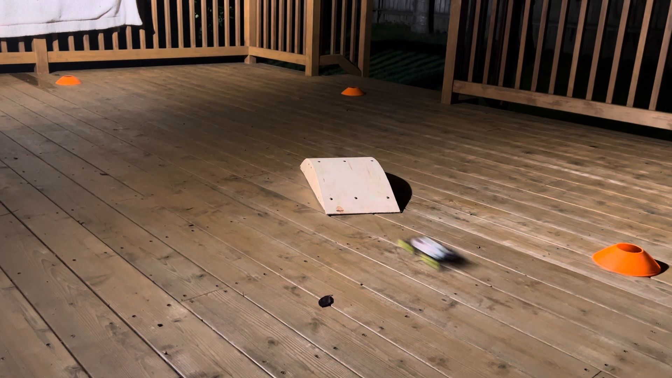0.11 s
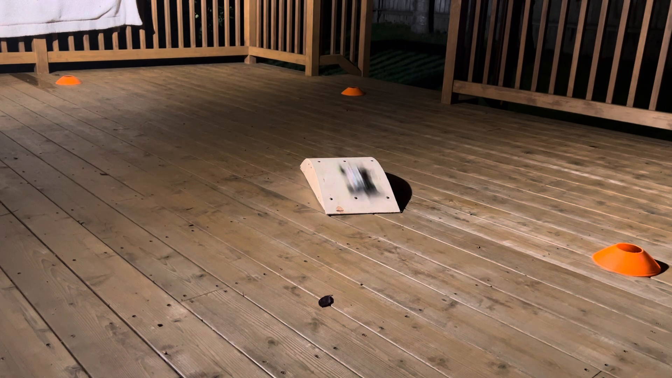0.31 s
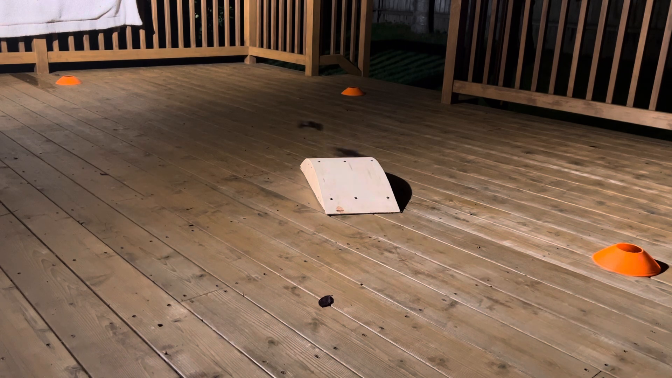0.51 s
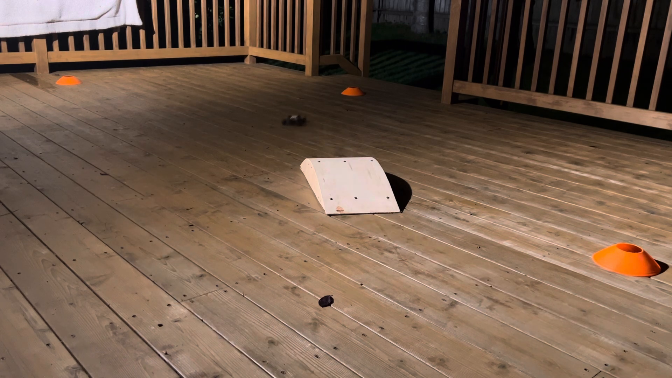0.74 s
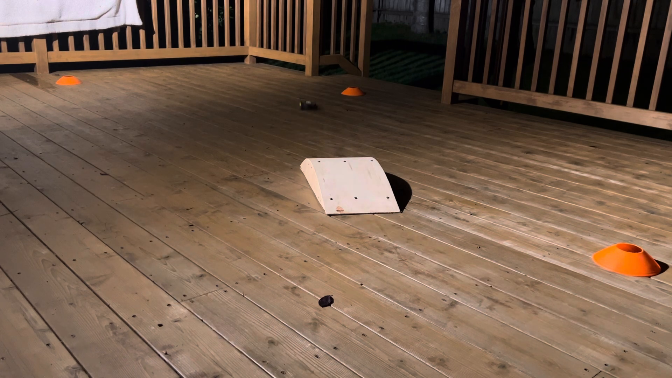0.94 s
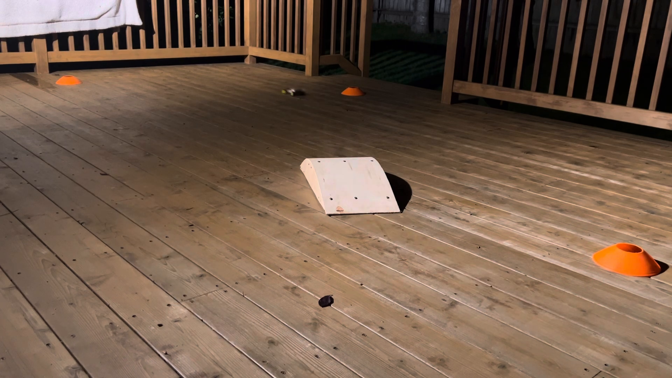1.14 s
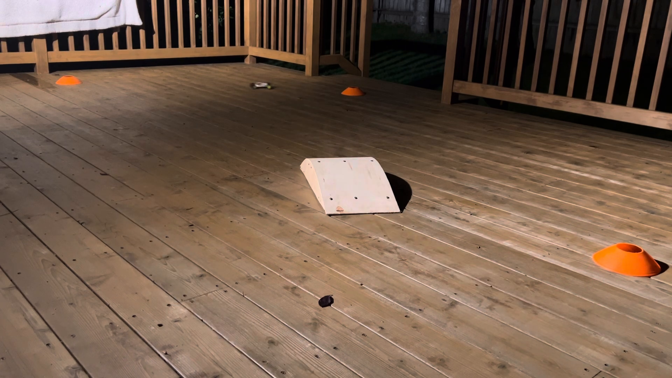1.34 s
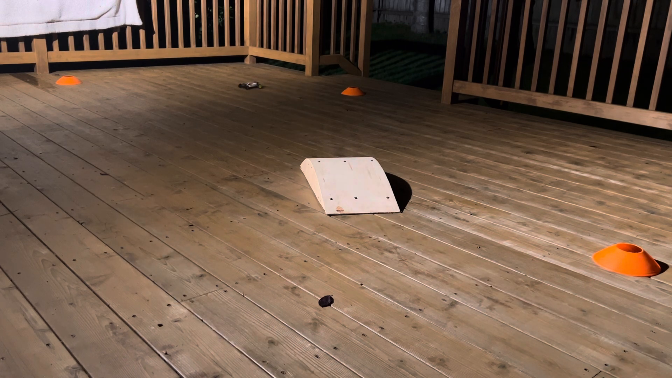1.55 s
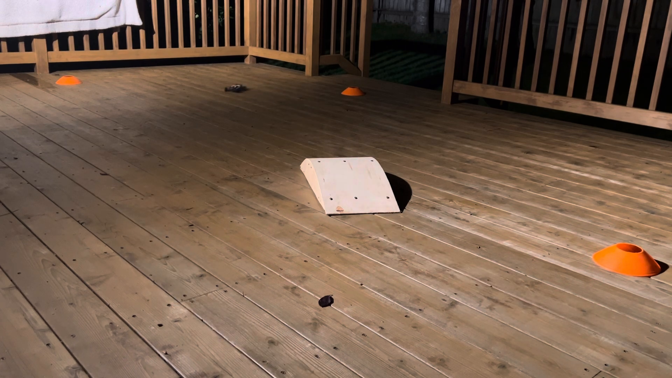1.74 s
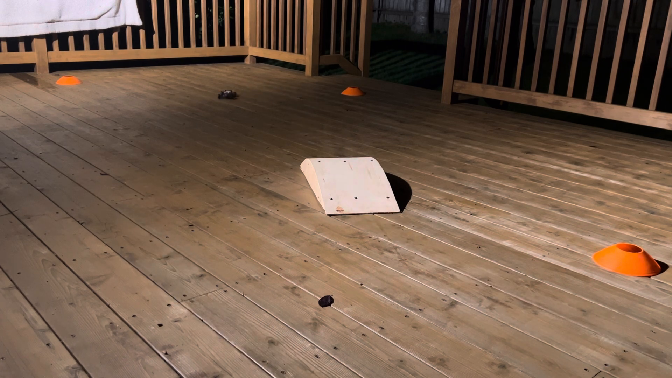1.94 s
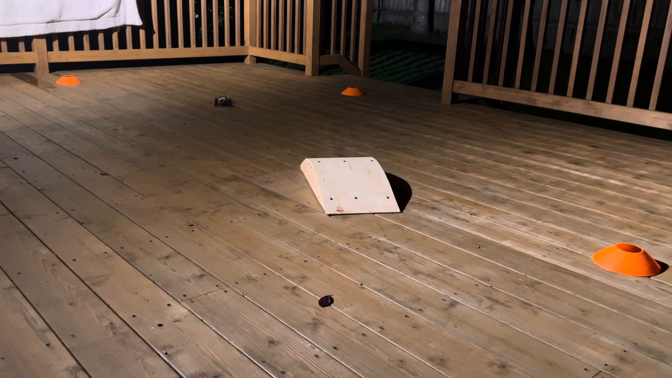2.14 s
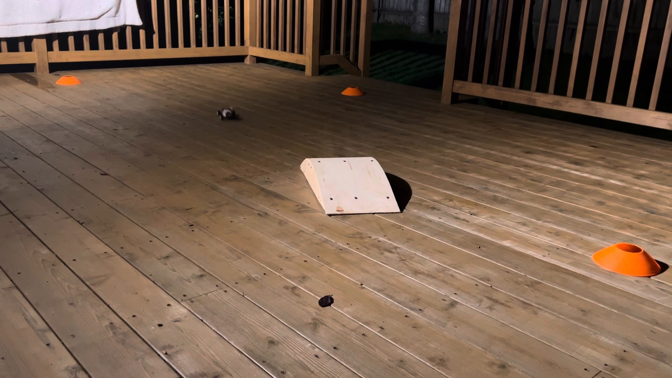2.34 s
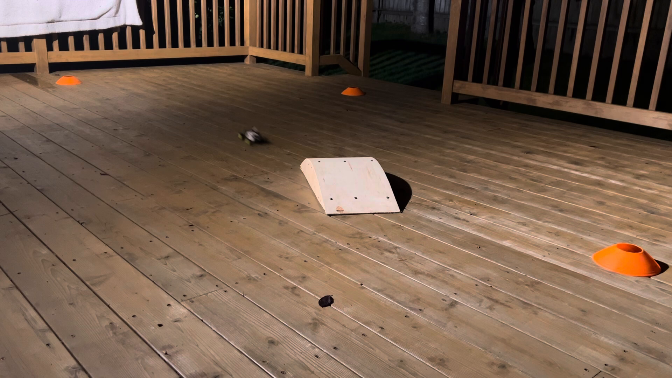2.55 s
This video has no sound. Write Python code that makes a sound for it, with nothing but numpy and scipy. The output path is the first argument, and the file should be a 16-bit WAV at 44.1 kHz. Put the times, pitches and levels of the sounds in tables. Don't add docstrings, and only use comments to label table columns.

```python
import sys
import numpy as np
from scipy import signal
from scipy.fft import rfft, irfft, next_fast_len
from scipy.io import wavfile
from scipy.ndimage import map_coordinates

SR = 44100
rng = np.random.default_rng(int(sys.argv[2]) if len(sys.argv) > 2 else 0)


def unload_wav(signal):
    wavfile.write(
        sys.argv[1],
        SR,
        np.round(np.clip(np.atleast_2d(signal).T, -1, 1) * 32767).astype(np.int16),
    )


def invert_db(level):
    return 10 ** (np.asarray(level, dtype=float) / 20)


N = 114660


def unit(x):
    return x / np.sqrt(np.mean(x ** 2) + 1e-20)


def along(points, hz):
    point_hz, value = np.transpose(points)
    return np.interp(np.log(hz + 1), np.log(point_hz + 1), value)


def curves(rows):
    time_s, *columns = np.transpose(rows)
    return [np.interp(np.arange(N) / SR, time_s, column) for column in columns]


def wobble(knots_per_s, size=N):
    knots = rng.standard_normal(int(size * knots_per_s / SR) + 4)
    return map_coordinates(knots, [np.arange(size) * knots_per_s / SR])


def filtered(x, response):
    size = next_fast_len(N + SR // 2)
    hz = np.fft.rfftfreq(size, 1 / SR)
    return irfft(rfft(x, size) * response(hz), size)[..., :N]


def noise_coloured(points):
    return unit(filtered(rng.standard_normal(N), lambda hz: invert_db(along(points, hz))))


def echo(x, t60_s):
    t = np.arange(SR // 2) / SR
    tail = rng.standard_normal(SR // 2) * invert_db(-60 * t / t60_s)
    return signal.fftconvolve(x, tail / np.linalg.norm(tail))[:N]


def knocks(hits, modes, rise_s):
    out, t = np.zeros(N + SR), np.arange(SR // 2) / SR
    hz, level_db, t60_s = np.transpose(modes)[:, :, None]
    crack_filter = signal.butter(1, 3850, fs=SR, output="sos")
    for start_s, peak_db, tilt_db, crack_db in hits:
        luck = rng.standard_normal((len(modes), 2))
        tilt = tilt_db * np.log2(np.maximum(hz, 300) / 400)
        start_db = level_db + tilt + 2 * luck[:, :1]
        mode_hz = hz * (1 + .0006 / t60_s * luck[:, 1:])
        ring = invert_db(start_db - 60 * t / t60_s) * np.sin(2 * np.pi * mode_hz * t)
        grain = signal.sosfilt(crack_filter, rng.standard_normal(len(t)))
        crack = invert_db(crack_db - 60 * t / 0.086) * grain
        blow = ring.sum(0) * (1 - np.exp(-t / rise_s)) + crack
        out[round(start_s * SR):][:len(t)] += invert_db(peak_db - 7) * blow
    return out[:N]


# centre_hz, width_hz, level_db
CHASSIS_MODES = [(1260, 280, -2), (1630, 220, 1.5), (2060, 260, -2), (2320, 220, -3), (2900, 240, 1.5),
                 (3420, 340, 1.5), (4120, 320, -1), (4550, 320, -3), (5000, 320, -4), (5850, 260, 1.5),
                 (6280, 300, 1), (6780, 320, -5), (7950, 420, 2.5)]


def body_db(hz):
    power = invert_db(2 * -10)
    for centre_hz, width_hz, level_db in CHASSIS_MODES:
        power = power + invert_db(2 * level_db) / (1 + (2 * (hz - centre_hz) / width_hz) ** 4)
    return 10 * np.log10(power)


# freq_hz, level_db (per Hz)
CHASSIS_COLOUR = [(300, -9.5), (900, -11), (1500, -3.5), (2300, -9), (4000, -8), (8000, -9.5), (15000, -8),
                  (16000, -26)]


def brush_hiss(treble_db):
    grit = rng.standard_normal(N) * invert_db(2.5 * wobble(900))
    hiss = unit(filtered(grit, lambda hz: invert_db(along(CHASSIS_COLOUR, hz) + .3 * body_db(hz))))
    treble = filtered(hiss, lambda hz: hz ** 4 / (hz ** 4 + 4400 ** 4))
    return hiss + (invert_db(treble_db) - 1) * treble


# time_s, mesh_hz, whine_db (over the hiss)
THROTTLE = [
    [(0, 1111, -5), (.06, 1279, -5.5), (.09, 1458, 0), (.12, 1595, -3.5), (.14, 1735, -1), (.17, 1860, -5),
     (.2, 1990, -2), (.24, 2055, -10), (.3, 2095, -7)],
    [(.735, 1236, -2), (.755, 1351, -2), (.775, 1420, 1.5), (.79, 1487, 0), (.81, 1598, -3.5),
     (.83, 1640, -7), (.86, 1666, -7.5), (.885, 1655, -3), (.915, 1524, -7)],
    [(1.58, 965, 3), (1.593, 1226, 6), (1.615, 1315, 5.5), (1.628, 1469, 5), (1.645, 1648, -5.5),
     (1.67, 1664, -11), (1.69, 1600, -8), (1.71, 1460, -7), (1.73, 1460, -13)],
    [(1.96, 1315, -7), (2.0, 1395, -2), (2.06, 1514, -1), (2.11, 1580, 1), (2.15, 1676, 0),
     (2.18, 1700, -7), (2.21, 1740, -9)],
    [(2.2, 926, -9), (2.25, 961, -5.5), (2.3, 988, -7.5), (2.36, 1032, -4), (2.42, 1088, -10),
     (2.48, 1138, -6.5), (2.53, 1192, -7), (2.57, 1294, -5), (2.6, 1390, -2)],
]
MESH_ORDERS = [(-1, -3, -5, -4, -11, -14), (-2, -1, -13, -4, -14, -18), (2, -13, -24, -24, -24, -24),
               (-1, -14, -5, -18, -18, -18), (5, -2, -2, -10, -5, -8)]
MESH_WANDER = [130, 150, 230, 130, 90]


def gear_whine():
    phase_wander_rad, flutter_db = 1.05, 2.5
    whine = np.zeros(N)
    for rows, orders, wander_hz in zip(THROTTLE, MESH_ORDERS, MESH_WANDER):
        first = max(round((rows[0][0] - .02) * SR), 0)
        span = slice(first, round((rows[-1][0] + .01) * SR))
        mesh_hz, whine_db = [curve[span] for curve in curves(rows)]
        size = len(mesh_hz)
        gate = signal.windows.tukey(size, .1)
        turns = 2 * np.pi * np.cumsum(mesh_hz) / SR
        for k, order_db in enumerate(orders, 1):
            level_db = whine_db + order_db + body_db(k * mesh_hz) + flutter_db * wobble(45, size)
            phase = k * turns + phase_wander_rad * np.sqrt(k) * wobble(wander_hz, size)
            whine[span] += gate * invert_db(level_db) * np.sin(phase)
    return whine


# time_s, level_db, treble_db
DRIVE_EFFORT = [(0, -42.5, -3), (.22, -37.5, -2), (.37, -44.5, 3.5), (.43, -52, 6), (.6, -57, 4.5),
                (.612, -42.5, 1), (.69, -49, -5.5), (.79, -46, 3.5), (.92, -47.5, -1.5), (.975, -52, -0.5),
                (1.06, -53, 2), (1.2, -55.5, -12), (1.5, -70.5, -10), (1.59, -49, -3.5), (1.7, -50, -1),
                (1.77, -59.5, -1), (1.93, -55.5, -3.5), (2.1, -54, 0), (2.6, -49, 3)]


def motor():
    drive_db, treble_db = curves(DRIVE_EFFORT)
    hiss = brush_hiss(treble_db) * invert_db(drive_db + wobble(39.99))
    whine = gear_whine() * invert_db(drive_db)
    rail_delay_s, rail_t60_s, rail_db = .02, .15, -7
    railings = np.pad(echo(whine, rail_t60_s), (round(rail_delay_s * SR), 0))[:N]
    return hiss + whine + invert_db(rail_db) * railings


WOOD_RISE_S = .0015

# start_s, peak_db, tilt_db (per octave), crack_db
RAMP_BLOWS = [(.238, -18, 9, -19), (.2425, -7.5, -2, -23), (.249, -9.5, 0, -26), (.255, -7, -7.5, -13.5),
              (.273, -10.5, 6.5, -16), (.280, -5.5, 1.5, -12.5), (.285, -15.5, 3.5, -20),
              (.291, -9, -17, -38), (.30, -18.5, 7, -32), (.312, -21.5, -15.5, -27),
              (.328, -23.5, -33, -17), (.347, -27, -18, -27)]
# mode_hz, level_db, t60_s
PLYWOOD = [(120, -13, 0.11), (268, -24, 0.01), (329.1, -3.5, 0.12), (322.8, -30.5, 1.17),
           (364.6, -3.5, 0.12), (397.4, 0.5, 0.078), (448, -4, 0.046), (558, 1.5, 0.044), (704, 2, 0.021),
           (850, -7.5, 0.08), (1026, -7.5, 0.042), (1340, -14.5, 0.033), (1525, -16, 0.035),
           (2120, -23, 0.014)]
# centre_hz, inner_width_hz, outer_width_hz
RAMP_DIP = (205, 23, 69)


def ramp():
    gap_hz, inner_hz, outer_hz = RAMP_DIP

    def notch(hz):
        stiffness = gap_hz ** 2 - hz * hz
        return (stiffness + 1j * hz * inner_hz) / (stiffness + 1j * hz * outer_hz)

    return filtered(knocks(RAMP_BLOWS, PLYWOOD, WOOD_RISE_S), notch)


# start_s, peak_db, tilt_db (per octave), crack_db
LANDING_BLOWS = [(.610, -24.5, -8, -31), (.615, -18.5, -21.5, -33), (.623, -25, -2.5, -28),
                 (.636, -19, -2.5, -29), (.640, -20, 2.5, -31), (.6445, -13, 1.5, -15),
                 (.649, -7.5, -2.5, -15), (.656, -15, 4, -34), (.664, -46, -13, -13),
                 (.677, -18.5, -22.5, -24), (.684, -31, 4, -28), (.72, -35.5, -40, -34),
                 (2.583, -41.5, 3, -18)]
# mode_hz, level_db, t60_s
DECK_BOARDS = [(128, -15.5, 0.036), (180.4, -9.5, 0.038), (290, -4, 0.042), (271.6, -22.5, 0.54),
               (352, -12.5, 0.057), (384, -1, 0.059), (531, 2.5, 0.031), (631, 9, 0.016), (871, -2, 0.038),
               (965, -1, 0.029), (1435, 0.5, 0.031), (1730, -7.5, 0.025), (2400, 0.5, 0.0058)]
# start_s, peak_db, tilt_db (per octave), crack_db
DECK_SWAY = [
    (.66, -37, 0.0074, -62),
    (.71, -27.5, 0.0054, -56),
]
# mode_hz, level_db, t60_s
DECK_JOISTS = [(41, -2, 0.28), (73, -4, 0.33), (96.8, -9, 0.26)]


def deck():
    return knocks(LANDING_BLOWS, DECK_BOARDS, WOOD_RISE_S) + knocks(DECK_SWAY, DECK_JOISTS, 0.02)


# start_s, peak_db, t60_s
SHELL_CLICKS = [
    (0.06, -39, 0.087),
    (1.784, -26, 0.019),
    (1.784, -30, 0.074),
    (1.8046, -35, 0.037),
    (1.821, -32, 0.049),
    (1.836, -39, 0.07),
    (1.846, -43.5, 0.14),
    (1.863, -44.5, 0.14),
    (2.142, -34.5, 0.033),
    (2.583, -36, 0.15),
]
# freq_hz, level_db (per Hz)
SHELL_COLOUR = [(1200, -50), (1900, -2.5), (2700, 0), (3500, -6.5), (5200, -2.5), (6800, -17.5),
                (7800, -12.5), (16000, -17)]


def shell():
    t = np.arange(N) / SR
    strikes = np.zeros(N)
    for start_s, peak_db, t60_s in SHELL_CLICKS:
        strikes += invert_db(peak_db - 8.5 - 60 * np.abs(t - start_s) / t60_s) * (t >= start_s)
    return strikes * noise_coloured(SHELL_COLOUR)


# time_s, level_db
ROLLING = [(0, -98), (.38, -47.5), (.45, -51.5), (.6, -81), (.7, -41), (.76, -46.5), (.85, -56.5),
           (.92, -48), (.97, -50.5), (1.03, -50), (1.11, -48), (1.18, -54), (1.25, -60), (1.55, -68.5),
           (2.0, -62), (2.3, -63), (2.6, -61.5)]
# freq_hz, level_db
TYRE_TREAD = [(120, 0.5), (200, 0.5), (330, 0.5), (450, 2), (560, -5.5), (700, 0), (1000, -4), (2500, 10.5)]


def tyres():
    drums_per_s, scatter_db = 1200, 1.5
    size = invert_db(scatter_db * rng.exponential(size=N)) * (rng.random(N) < drums_per_s / SR)
    damped = [(hz, db, min(.5 * t60_s, .04)) for hz, db, t60_s in DECK_BOARDS]
    thud = knocks([(0.0021, 0, -0.0094, -37)], damped, 0.00076)[:SR // 3]
    drumming = signal.fftconvolve(size * rng.standard_normal(N), thud)[:N]
    rolling = unit(filtered(drumming, lambda hz: invert_db(along(TYRE_TREAD, hz))))
    return rolling * invert_db(curves(ROLLING)[0])


# freq_hz, level_db (per Hz)
AIR_COLOUR = [(15, -60), (25, -0.5), (123, -0.5), (169, -13), (617, -22), (747, -17.5), (985, -18),
              (4000, -35), (5200, -77), (8800, -120)]


def air():
    return invert_db(-55.5 + 0.28 * wobble(6.0)) * noise_coloured(AIR_COLOUR)


# freq_hz, likeness (1 = identical)
PORT_LIKENESS = [(60, 1), (300, 0.78), (1000, 0.032), (1600, 0.22), (2100, 0.89), (5500, 0.32),
                 (6800, 0.98), (15000, 1)]


def placed(x, pan_db, scatter=1):
    x = x + invert_db(-10) * echo(x, .19)
    quarter_turn = filtered(x, lambda hz: -1j)
    apart = scatter * echo(x, .096) + np.sqrt(1 - scatter ** 2) * quarter_turn

    def split(hz):
        angle = np.arccos(np.clip(along(PORT_LIKENESS, hz), -1, 1)) / 2
        return [np.cos(angle), np.sin(angle)]

    mid, side = filtered(np.array([x, apart]), split)
    pan = invert_db(np.array([[pan_db / 2], [-pan_db / 2]]))
    return np.array([mid + side, mid - side]) * pan


# freq_hz, left_minus_right_db
WOOD_BALANCE = [(60, 2), (110, 1.5), (200, -5.5), (380, -0.5), (700, 5.5), (1290, -3.5), (2380, 9),
                (4400, -0.5)]


def scene():
    wood_scatter = .4
    wood = placed(ramp(), -.3, wood_scatter) + placed(deck(), -0.31, wood_scatter)
    wood = filtered(wood, lambda hz: invert_db(along(WOOD_BALANCE, hz) * [[.5], [-.5]]))
    buggy = placed(motor(), 1.33) + placed(shell(), 0.63) + placed(tyres(), 0.84)
    port_wind = invert_db(-15.5) * np.array([air(), air()])
    return wood + buggy + placed(air(), 0.44) + port_wind


# freq_hz, left_lead_rad
PORT_PHASE = [(0, 0), (2000, 0), (3300, 1.1), (5000, 0), (5800, -.8), (6900, 0), (9900, -3.14),
              (12900, -6.28), (13700, -6.9), (15300, -9.3), (16000, -9.5)]


def microphone(dry):
    def response(hz):
        lead_rad = np.interp(hz, *np.transpose(PORT_PHASE))
        low_cut = hz ** 4 / (hz ** 4 + 33 ** 4)
        return np.exp(.5j * lead_rad * [[1], [-1]]) * (hz < 15770) * low_cut

    return filtered(dry, response)


def low_pass(x):
    return signal.sosfilt(signal.butter(12, 15770, fs=SR, output="sos"), x)


def record(dry):
    mix = microphone(dry)
    return low_pass(mix)


dry = scene()
out = record(dry)
unload_wav(out)
```